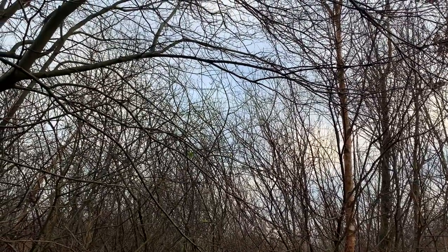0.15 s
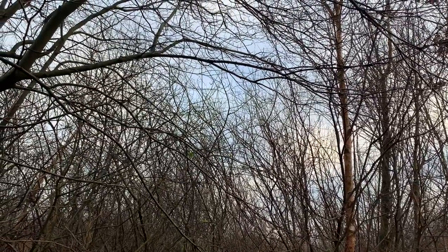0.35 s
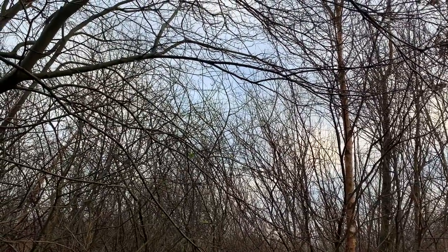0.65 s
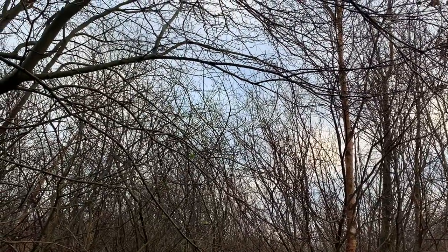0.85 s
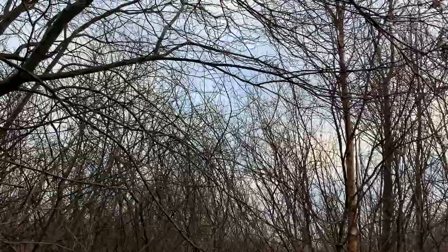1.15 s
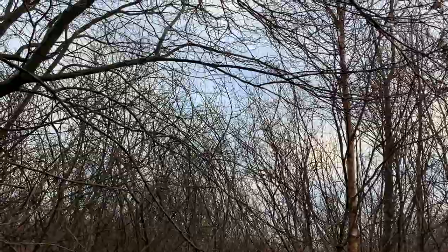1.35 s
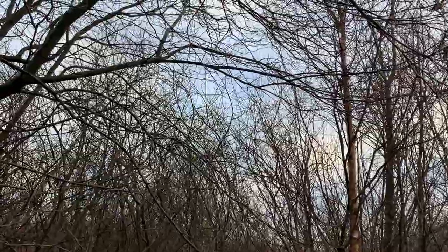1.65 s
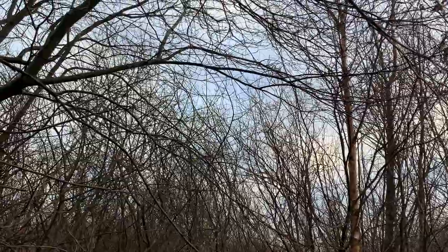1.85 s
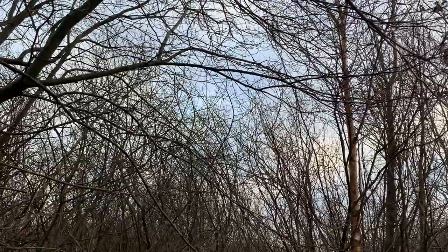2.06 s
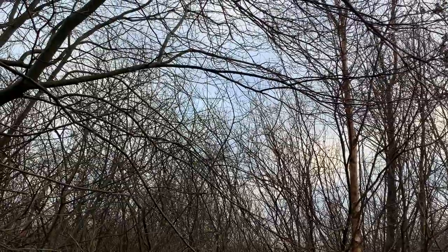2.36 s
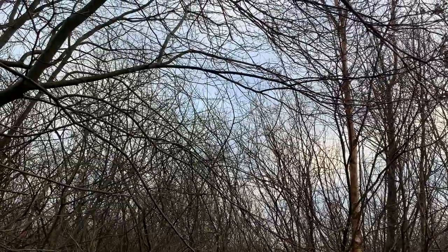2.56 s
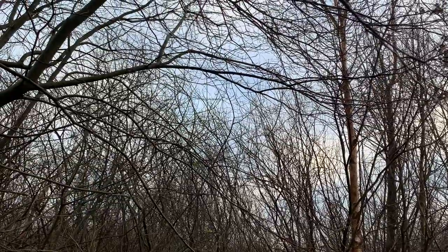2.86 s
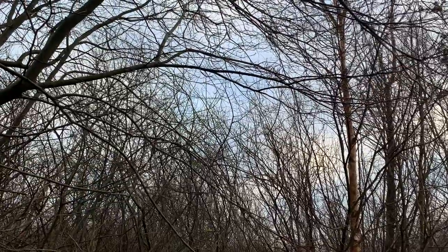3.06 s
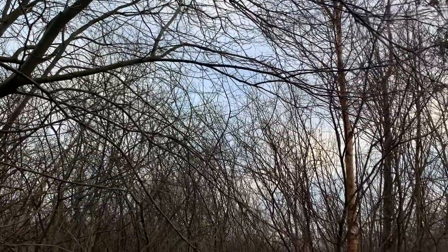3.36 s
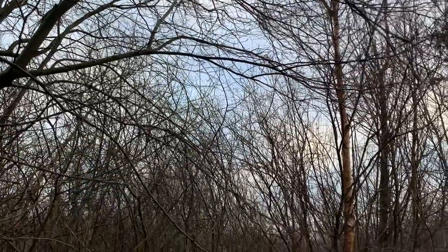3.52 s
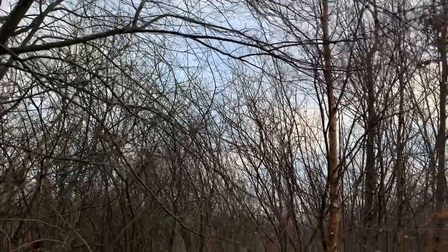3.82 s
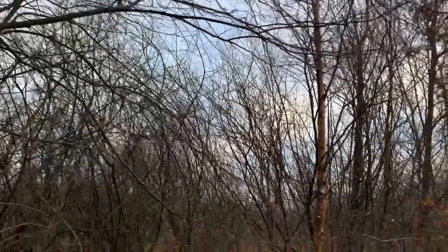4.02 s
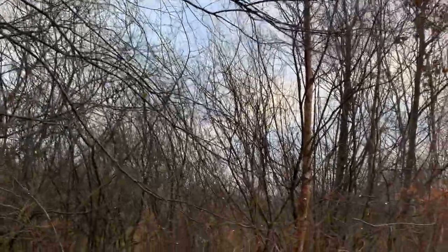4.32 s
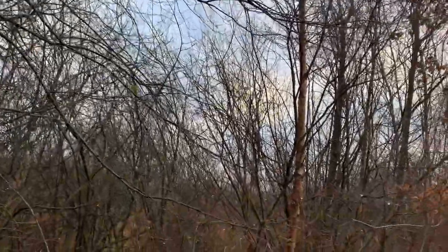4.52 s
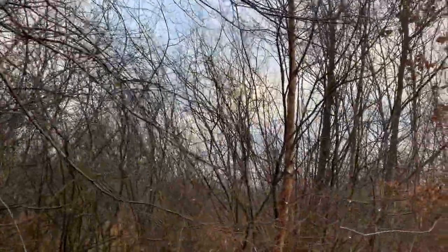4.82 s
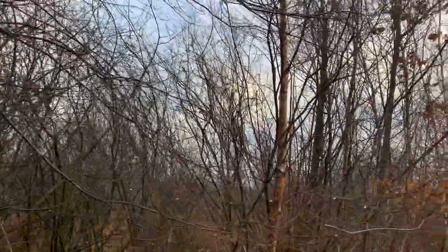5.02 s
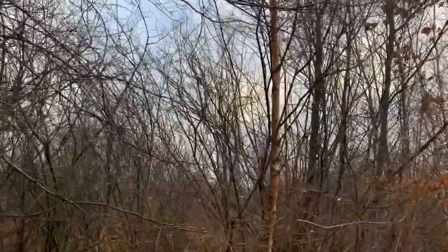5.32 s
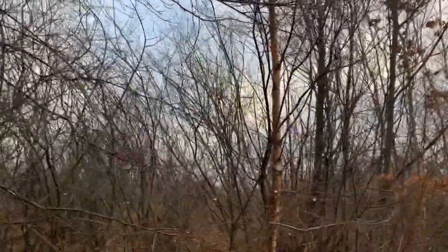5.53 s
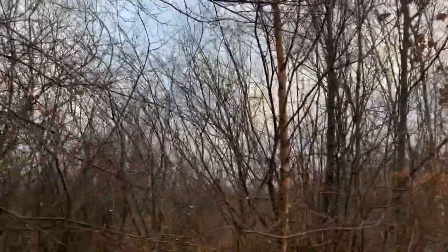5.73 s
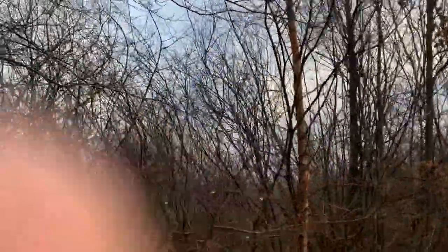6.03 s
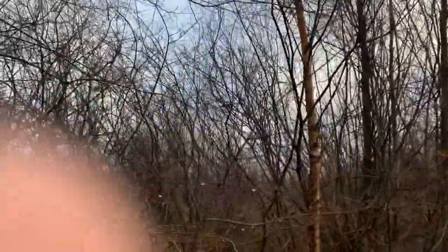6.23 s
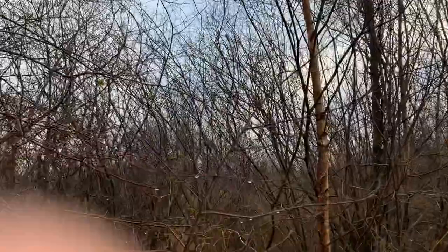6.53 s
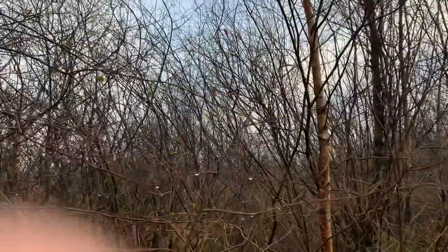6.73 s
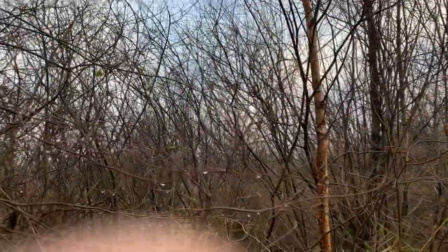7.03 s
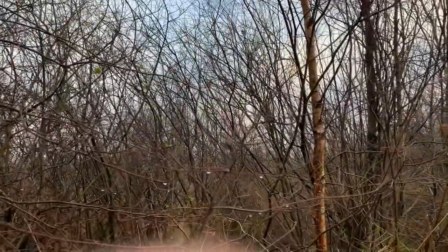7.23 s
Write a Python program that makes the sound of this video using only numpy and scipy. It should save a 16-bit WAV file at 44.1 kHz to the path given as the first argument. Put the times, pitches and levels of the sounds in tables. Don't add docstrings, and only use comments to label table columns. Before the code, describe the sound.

A quiet bare thicket by a marsh, heard through a handheld stereo microphone with light breeze rumbling on its case and faint hiss. At first a far road roars softly, with a brief brighter pass near 1.3 s, then recedes. A hidden marsh bird gives short arched chips at 0.3 and 0.9 s, then a high hoarse squeal from 1.7 to 2 s with a low falling answer. Thin, tiny buzzes from small birds come at the start, 2.4, 3.9 and 6.4-6.8 s. Light knocks begin at 2 s; a very loud hollow knock hits at 4 s, over a squeal stepping down until 4.4 s. From 5 s, taps and dry rubbing cluster. A wavering squeal at 5.8-6.1 s ends in low falling answers from two birds. Hard cracks and thumps strike at 6.45 and, strongest, 6.97 s, then lighter touches until about 7.4 s. Twigs scatter the calls into a short airy tail.

```python
import sys
import numpy as np
from scipy import signal
from scipy.fft import rfft, irfft, next_fast_len
from scipy.io import wavfile
from scipy.ndimage import uniform_filter1d, map_coordinates

SR = 44100
rng = np.random.default_rng(int(sys.argv[2]) if len(sys.argv) > 2 else 0)


def wav_out(sig):
    wavfile.write(sys.argv[1], SR, np.round(np.clip(np.atleast_2d(sig).T, -1, 1) * 32767).astype(np.int16))


def amplitude_ratio(level_db):
    exponent = np.asarray(level_db, float) / 20
    return 10 ** exponent


N = 325388

# time_s, level_db
BREEZE = [(0.0, -54), (0.24, -57), (1.38, -53), (1.79, -55.5), (1.99, -53), (2.53, -53), (2.96, -57.5),
          (4.09, -58), (4.44, -59.5), (4.91, -57.5), (6.0, -60.5), (6.84, -60.5), (7.09, -56.5),
          (7.38, -63)]
# frequency_hz, density_db
RUMBLE = [(20, -39), (40, -5), (65, 4), (100, -2), (160, -13.5), (250, -36.5)]
# time_s, nearness_db, clear_path_db, engine_load_db
ROAD = [(0.0, -57, -1, 5.5), (0.12, -55, -1, 3), (0.43, -59, -2.5, -3), (0.66, -57.5, -0.5, -3),
        (0.78, -56.5, 0.5, 1), (0.9, -54.5, -6, -4), (1.25, -59, 3.5, 4.5), (1.5, -62.5, 6, 1),
        (2.01, -62, 7, 1), (2.71, -67, 4, 0), (3.14, -66, 3, 0), (3.82, -72, 5.5, 1.5),
        (4.17, -66.5, 6.5, 1), (4.7, -66, 1.5, 0.5), (6.35, -67, 0, 1), (6.55, -70, 5, 1.5),
        (7.21, -71, 7, 5.5), (7.38, -63, -3, -0.5)]
# frequency_hz, density_db
DRONE = [(100, -17), (200, 0.5), (350, -1.5), (600, -9.5), (800, 1.5)]
ROAR = [(450, -14), (800, -6), (1150, 4), (1700, -9), (2500, -21.5), (3500, -43)]
WHINE = [(900, -27), (1400, 4), (1750, 8), (2300, -4.5), (3200, -57)]
TYRE_HISS = [(1500, -9.5), (2500, -2.5), (3500, -11.5), (5000, -25), (7000, -42)]
LORRY = [(3000, -10), (4200, 2), (5500, -3), (6800, -18)]
DRONE_DB, ROAR_DB, WHINE_DB, TYRE_HISS_DB = -64.5, -55, -66.5, -71.5
DRONE_FOLLOWS, ROAR_FOLLOWS, WHINE_FOLLOWS, TYRE_HISS_FOLLOWS = 0.043, 0.48, 1.75, 1.45
LORRY_S, LORRY_SWELL_S, LORRY_DB = 1.26, 0.11, -70

# frequency_hz, density_db
SELF_NOISE = [(3000, 14.5), (5000, -7), (7000, 0.5), (9500, 1), (11700, -2), (14000, -1), (16500, -20)]
SELF_NOISE_DB = -82
# frequency_hz, likeness_0_to_1
LIKENESS = [(60, 0.95), (400, 0.99), (800, 0.72), (1700, 0.64), (4000, 0.15), (7000, 0.4), (11700, 1),
            (15000, 0.9)]
# frequency_hz, lag_rad
ROAD_TURN = [(0, 0), (100, .43), (400, 1.55), (800, 3.1), (1700, 3.9), (4000, 8.5), (8000, 17.6),
             (16000, 29.)]
NEAR_TURN = [(0, .1), (100, .34), (400, .9), (800, 1.5), (2760, 3.6), (7000, 9.4), (11700, 15.7),
             (16400, 22.)]
BIRD_TURN = [(0, .1), (800, 1.5), (2950, 3.6), (4700, 5.8), (5900, 8.4), (6700, 8.6), (8800, 11.9),
             (16400, 22.2)]
HAND_TURN = [(0, .1), (170, .48), (400, .9), (650, 1.55), (1000, 1.65), (2150, 4.2), (4700, 5.9),
             (11700, 15.7), (16400, 22.)]
# frequency_hz, left_minus_right_db
TILT = [(60, 0.5), (600, 0), (1300, -3), (2400, -3), (3100, -4), (4700, -2.5), (6300, -5), (9000, 0.5)]

# start_s, length_s, level_db, centre_hz, swing_hz
BUZZES = [
    (0, 0.15, -80.5, 7000, 220),
    (0.326, 0.05, -75.5, 7400, 900),
    (2.392, 0.061, -78.5, 7650, 850),
    (3.366, 0.045, -90, 7300, 700),
    (3.628, 0.069, -82.5, 7420, 910),
    (3.89, 0.041, -72, 7480, 890),
    (6.361, 0.045, -76.5, 7400, 850),
    (6.532, 0.047, -74, 7620, 940),
    (6.774, 0.044, -88, 7250, 810),
]
THICKET_T60_S, THICKET_DB = 0.32, -4.5
TWIG_GLINT_HZ, TWIG_GLINT_DB, TWIG_GLINT_T60_S, TWIG_HZ = 7500, 9, 0.5, 3700

# start_s, ring_db, thump_db, ring_hz
KNOCKS = [(2.06, -54, -50.5, 855), (3.419, -47, -57, 800), (4.02, -13.5, -27.5, 686),
          (4.038, -43, -50, 711), (4.138, -42, -50.5, 718), (4.185, -31, -41.5, 704),
          (4.203, -41.5, -46, 700), (4.244, -33, -43.5, 703), (4.756, -60, -54.5, 710),
          (4.833, -63, -48, 620), (5.07, -39.5, -59, 674), (5.156, -43, -58, 674), (5.421, -47, -74, 945),
          (5.479, -33.5, -64, 880), (5.678, -38, -49, 780), (5.695, -33, -40.5, 820),
          (5.807, -48, -54, 950), (6.035, -37.5, -63, 894), (6.106, -52, -51, 770), (6.21, -51, -64, 750),
          (6.292, -49, -48, 725), (6.391, -48, -54, 756), (6.426, -38, -47.5, 830),
          (6.451, -25.5, -47, 1010), (6.454, -26.5, -32, 747), (6.975, -14.5, -23, 810),
          (7.013, -41.5, -67, 730), (7.089, -36.5, -56, 730), (7.177, -50, -60, 719), (7.24, -40, -48, 796)]
MORE_KNOCKS = [(2.566, -69, -54.5, 950), (4.012, -42, -67, 620), (4.048, -48, -65, 756), (5.156, -42, -80, 1430),
               (5.18, -51.5, -64, 650), (5.312, -62, -65, 727), (5.333, -51, -65, 875), (5.36, -47, -72, 845),
               (5.43, -45, -74, 900), (5.452, -46, -68, 865), (5.469, -39.5, -55, 830), (5.493, -39, -55, 780),
               (5.53, -42, -55, 820), (6.325, -62, -50, 500), (6.417, -53, -60, 1000), (6.436, -44, -47, 890),
               (6.443, -35.5, -52, 1030), (6.674, -53, -74, 810), (6.703, -56, -54.5, 720), (6.775, -52, -74, 770),
               (6.908, -54, -68, 665), (6.93, -52, -82, 790), (6.968, -42, -60, 1000), (6.972, -32, -68, 1070),
               (6.9744, -18, -64, 1053), (7.165, -59, -70, 775), (7.191, -49, -57, 710), (7.22, -63, -56, 807)]
# start_s, peak_db, pitch_hz
THUDS = [(1.462, -43.5, 134), (2.57, -39.5, 74.4), (3.389, -40, 48.6), (3.826, -34.5, 60.3),
         (4.029, -35, 70), (4.401, -43.5, 68.6), (4.834, -49, 300), (4.851, -64, 262), (5.021, -44, 62),
         (5.079, -44, 100.3), (6.323, -46, 112), (6.368, -47, 89), (6.456, -28, 84), (6.688, -42.5, 64),
         (6.984, -37, 75), (7.11, -47, 70.6)]
# start_s, peak_db, brightness_db
CRACKS = [
    (2.059, -53, -7),
    (5.676, -45.5, -4),
    (5.694, -46, -3),
    (6.446, -31, -11),
    (6.4494, -27.5, -6.5),
    (6.457, -49, -8),
    (6.9725, -23, -1),
    (7.012, -48, -7),
    (7.089, -49, -10),
]
# peak_s, swell_s, release_s, level_db, hiss_db
RUBS = [(5.36, 0.098, 0.026, -51, -74), (3.72, 0.14, 0.65, -95, -74), (5.445, 0.03, 0.14, -60.5, -82),
        (5.523, 0.13, 0.023, -43, -62), (5.709, 0.072, 0.1, -52, -65.5), (5.816, 0.031, 0.18, -54, -68.5),
        (6.039, .02, 0.045, -40.5, -65), (6.293, 0.0053, 0.29, -55.5, -87), (6.447, 0.048, 0.028, -35, -64),
        (6.68, 0.07, 0.084, -55, -92.5), (7.0, 0.033, 0.07, -56, -67), (7.2, 0.12, 0.042, -57, -73),
        (7.241, 0.053, 0.036, -50.5, -82)]
# frequency_hz, density_db
SKIN = [(1500, 6), (3000, 0), (5000, -15), (9000, -14.5), (16000, -19)]
RUB_DEPTH_DB = 26.5
SPREAD_HZ = 267
PAD_HZ = 2200

# start_s, length_s, top_hz, level_db
CHIPS = [
    (0.293, .042, 2532, -58),
    (0.925, 0.034, 2535, -56.5),
]
# time_s, pitch_hz, effort_db, beak_db_per_partial
SQUEALS = [
    [(1.69, 3213, -58, -14), (1.706, 3300, -53, 0), (1.72, 3214, -67, 13.5), (1.75, 2824, -58, -7),
     (1.78, 2784, -55.5, -6.5), (1.8, 2828, -57, -3), (1.812, 2780, -69, 14)],
    [(1.813, 2883, -67, 15), (1.83, 2880, -54, -3.5), (1.86, 2930, -70, 7.5), (1.885, 2914, -52.5, -2.5),
     (1.92, 2973, -61, -6), (1.954, 2970, -76, 4), (1.99, 2980, -55, -10)],
    [(5.83, 2637, -60, -14), (5.842, 3040, -50, 0), (5.862, 3140, -58, 5), (5.91, 2894, -53, -8),
     (5.96, 2968, -53, -6), (6.0, 2758, -50.5, -9), (6.03, 2817, -59, -3.5), (6.065, 2904, -50.5, -7),
     (6.1, 3215, -64, 0)],
]
# time_s, pitch_hz, effort_db, beak_db_per_partial
STEPPED = [
    [(3.975, 3150, -51, -5), (3.989, 3320, -53.5, 3.5), (4.039, 2807, -64.5, 7), (4.07, 2646, -65.5, 10.5),
     (4.11, 2760, -55.5, 1.5), (4.124, 2685, -54, -2.5), (4.131, 2508, -55, -6.5), (4.169, 2480, -61, -7),
     (4.195, 2596, -61, -6)],
    [(4.196, 2560, -57, -8), (4.21, 2593, -53, -4), (4.222, 2253, -65, 5), (4.244, 2293, -60, 2),
     (4.254, 2280, -66, 0), (4.266, 2354, -63, 9), (4.277, 2337, -62, 1), (4.286, 2400, -62.5, 9.5)],
    [(4.287, 2440, -61, 9), (4.305, 2450, -61, 0), (4.311, 2350, -69, 0), (4.318, 2240, -58, -3),
     (4.345, 2210, -62.5, 4), (4.356, 2095, -63, 2), (4.367, 2050, -69, 5)],
]
# start_s, length_s, first_hz, level_db, sag_hz_per_s
ANSWERS = [
    (1.967, 0.043, 1558, -66, 6010),
    (6.096, 0.074, 1685, -61.5, 3830),
]
# start_s, length_s, first_hz, level_db, sag_hz_per_s
MATE = [
    (6.097, 0.067, 1455, -68.5, 2580),
]
# frequency_hz, gain_db
THROAT = [(2300, 1.5), (3000, 1), (4700, -2.5), (6000, -7.5), (8500, -24), (10300, -26.5), (12400, -23),
          (15500, -31.5)]
STEPPED_THROAT = [(2300, 3), (3000, -2), (4700, -2), (6000, -11), (8200, -25.5), (9600, -40),
                  (11000, -21.5), (14500, -34.5)]
CHIP_THROAT = [(2300, 0), (4700, -2), (7500, -17), (10000, -34), (12500, -37), (15000, -44)]
ANSWER_THROAT = [(1500, -4), (3000, -4), (4200, 1.5), (5700, -6), (7000, -13), (10000, -46), (12300, -27),
                 (15500, -33)]
HOARSE_RAD, STEPPED_HOARSE_RAD = 0.022, 0.04
PATCHY_DB = 1.8
RASP_DB, RASP_HZ = -24, 4800
STRAIN_HZ, STRAIN_DB_PER_KHZ, ANSWER_STRAIN_DB_PER_KHZ = 2720, 36, 2
CHIP_RISE_HZ, CHIP_FALL_HZ, CHIP_TOP_SHARE, CHIP_EDGE_DB, CHIP_BEAK_DB = 295, 400, 0.45, 4.5, 1.5
SAG_DELAY_S, ANSWER_RISE_DB, ANSWER_FADE_DB, ANSWER_BEAK_DB = 0.01, 0, 5, 1


def columns(rows, t):
    time_s, *rest = np.transpose(rows)
    return [np.interp(t, time_s, column) for column in rest]


def on_log(points, hz):
    point_hz, value = np.transpose(points)
    return np.interp(np.log(hz + 1), np.log(point_hz), value)


def rms_one(x):
    return x / np.sqrt(np.mean(x ** 2) + 1e-20)


def drift(rate, n):
    knots = rng.standard_normal(int(n / SR * rate) + 3)
    return map_coordinates(knots, [np.arange(n) / SR * rate], order=3)


def noise(spectrum, flicker_db, rate):
    size = next_fast_len(N)
    hz = np.arange(size // 2 + 1) * SR / size
    inside = (hz > spectrum[0][0]) * (hz < spectrum[-1][0])
    gain = amplitude_ratio(on_log(spectrum, hz)) * inside
    alike = np.clip(on_log(LIKENESS, hz), 0, 1)
    mid, side = rfft(rng.standard_normal((2, size))) * gain
    pair = np.sqrt(1 + alike) * mid + np.sqrt(1 - alike) * side * [[1], [-1]]
    return rms_one(irfft(pair, size)[:, :N]) * amplitude_ratio(flicker_db * drift(rate, N))


def resonate(x, hz, width_hz, order=2):
    radius = np.exp(-np.pi * width_hz / SR)
    angle = 2 * np.pi * hz / SR
    poles = [1, -2 * radius * np.cos(angle), radius * radius]
    click = np.r_[1., np.zeros(4000)]
    for _ in range(order):
        x = signal.lfilter([1, 0, -1], poles, x)
        click = signal.lfilter([1, 0, -1], poles, click)
    return x / np.abs(click).max()


def butter_pass(x, hz, kind):
    return signal.sosfilt(signal.butter(2, hz, kind, fs=SR, output="sos"), x)


def add(out, s, sound):
    at = round(s * SR)
    out[at:at + len(sound)] += sound[:len(out) - at]


def fade(n, s):
    to_edge = np.minimum(np.arange(n), np.arange(n)[::-1])
    return np.minimum(1, to_edge / (s * SR))


def two_ports(pair, turn, tilt=1.):
    size = next_fast_len(N + 4096)
    hz = np.arange(size // 2 + 1) * SR / size
    half = amplitude_ratio(tilt * on_log(TILT, hz) / 2)
    lag = np.exp(-1j * np.interp(hz, *np.transpose(turn)))
    left = rfft(pair[0], size) * half * lag
    right = rfft(pair[1], size) / half
    return irfft(np.array([left, right]), size)[:, :N]


def microphone_hiss():
    return amplitude_ratio(SELF_NOISE_DB) * noise(SELF_NOISE, 0.55, 9.3)


def breeze():
    level_db = columns(BREEZE, np.arange(N) / SR)[0] + 4
    return amplitude_ratio(level_db) * noise(RUMBLE, 0.37, 12.)


def road():
    t = np.arange(N) / SR
    near_db, clear_db, load_db = columns(ROAD, t)
    near_db = near_db - near_db.mean()
    roar = amplitude_ratio(ROAR_DB + ROAR_FOLLOWS * near_db + 0.75 * load_db) * noise(ROAR, 0.87, 14.)
    whine = amplitude_ratio(WHINE_DB + WHINE_FOLLOWS * near_db) * noise(WHINE, 0.53, 35.0)
    drone = amplitude_ratio(DRONE_DB + DRONE_FOLLOWS * near_db + load_db) * noise(DRONE, 1.8, 12.)
    passing = np.exp(-0.5 * ((t - LORRY_S) / LORRY_SWELL_S) ** 2)
    lorry = amplitude_ratio(LORRY_DB) * passing * noise(LORRY, 1.0, 14.)
    hiss_db = TYRE_HISS_DB + TYRE_HISS_FOLLOWS * near_db + clear_db
    hiss = amplitude_ratio(hiss_db) * noise(TYRE_HISS, 0.17, 21.0)
    return drone + roar + whine + lorry + hiss


def thicket(x, wet_db):
    t = np.arange(int(0.5 * SR)) / SR
    onset = np.clip((t - 0.002) / 0.0045, 0, 1)
    tail = rng.standard_normal((2, len(t))) * amplitude_ratio(-60 * t / THICKET_T60_S) * onset
    tail = butter_pass(tail, TWIG_HZ, "high")
    tail[1] = 0.22 * tail[0] + 1.7 * tail[1]
    tail *= amplitude_ratio(wet_db) / np.sqrt(np.sum(tail ** 2, axis=1, keepdims=True))
    glint = butter_pass(tail[0], TWIG_GLINT_HZ, "high")
    tail = tail + amplitude_ratio(TWIG_GLINT_DB - 60 * t / TWIG_GLINT_T60_S) * glint
    return x + signal.fftconvolve(x[None], tail, axes=1)[:, :N]


def small_birds():
    out = np.zeros(N)
    for s, length, db, centre_hz, swing_hz in BUZZES:
        t = np.arange(0, length, 1 / SR)
        swing_rate_hz = 135 + 35 * drift(71.4, len(t))
        swing = np.sin(2 * np.pi * np.cumsum(swing_rate_hz) / SR)
        hz = centre_hz + swing_hz * swing + 120 * drift(242, len(t))
        whistle = np.sin(2 * np.pi * np.cumsum(hz) / SR)
        add(out, s, amplitude_ratio(db + 2.9 * drift(130, len(t))) * whistle * fade(len(t), 0.013))
    return out


def knocks():
    out, t = np.zeros(N), np.arange(3500) / SR
    click = 1. * (t == 0)
    thump = resonate(click, 141.4, 114.0)
    thump = thump + amplitude_ratio(5.0) * resonate(click, 194, 233.0) + amplitude_ratio(3.0) * resonate(click, 323, 400.0)
    lag = np.exp(-2 * np.pi * SPREAD_HZ / SR)
    thump = signal.sosfilt([[lag * lag, -2 * lag, 1, 1, -2 * lag, lag * lag]] * 2, thump)
    for s, ring_db, thump_db, hz in KNOCKS + MORE_KNOCKS:
        ring = resonate(click, hz, 428.0, order=4)
        ring = ring - amplitude_ratio(-17.0) * resonate(click, 1.308 * hz, 400.0, order=3)
        add(out, s - 0.0003, amplitude_ratio(ring_db + 3.5) * ring + amplitude_ratio(thump_db + 1.0) * thump)
    out = butter_pass(out, PAD_HZ, "low")

    for s, db, bright_db in CRACKS:
        grit = rng.standard_normal(len(t))
        snap = click + 0.044 * grit * amplitude_ratio(-60 * t / 0.0013)
        rattle = signal.lfilter([0.4], [1, -0.6], grit) * amplitude_ratio(-39 - 60 * t / 0.17)
        body = amplitude_ratio(-3.0) * resonate(snap, 2000, 970.0) + amplitude_ratio(-13.5) * resonate(snap, 3480, 810.0)
        top = amplitude_ratio(-6.0) * resonate(snap, 7100, 1500.0, order=1) + resonate(snap, 10440, 8900.0, order=1)
        add(out, s + 0.001865, amplitude_ratio(db) * (body + amplitude_ratio(bright_db) * top + rattle))

    for s, db, hz in THUDS:
        add(out, s - 0.003, amplitude_ratio(db) * resonate(click, hz, 55.6, order=3))
    return out


def rubbing():
    t = np.arange(N) / SR
    slips = (rng.random(N) < 800 / SR) * amplitude_ratio(2.0 * rng.exponential(1, N)) * rng.choice([-1, 1], N)
    body = rms_one(resonate(slips, 798, 440.0, order=3))
    body = body + amplitude_ratio(-6.5) * rms_one(resonate(slips, 130, 323.0))
    hiss = noise(SKIN, 0.75, 40.)
    pressure = []
    for peak_s, swell_s, release_s, *_ in RUBS:
        away = np.maximum((peak_s - t) / swell_s, (t - peak_s) / release_s)
        pressure.append(amplitude_ratio(-RUB_DEPTH_DB * away ** 1.8))
    level_db, hiss_db = np.transpose(RUBS)[3:]
    return amplitude_ratio(level_db) @ pressure * body + amplitude_ratio(hiss_db) @ np.power(pressure, 0.7) * hiss


def chip(s, length, top_hz, db):
    share = np.linspace(0, 1, 9)
    rising = share < CHIP_TOP_SHARE
    off_top = np.where(rising, 1 - share / CHIP_TOP_SHARE, (share - CHIP_TOP_SHARE) / (1 - CHIP_TOP_SHARE))
    hz = top_hz - np.where(rising, CHIP_RISE_HZ, CHIP_FALL_HZ) * off_top ** 1.2
    effort_db = db - CHIP_EDGE_DB * off_top ** 2
    return [(s + a * length, f, e, CHIP_BEAK_DB) for a, f, e in zip(share, hz, effort_db)]


def answer(s, length, hz, db, sag):
    last_hz = hz - sag * (length - SAG_DELAY_S)
    return [(s, hz, db - ANSWER_RISE_DB, ANSWER_BEAK_DB),
            (s + SAG_DELAY_S, hz, db, ANSWER_BEAK_DB),
            (s + length, last_hz, db - ANSWER_FADE_DB, ANSWER_BEAK_DB)]


def marsh_bird(notes, strain_db, throat=THROAT, hoarse=HOARSE_RAD):
    t = np.arange(N) / SR
    sounding = sum((t >= note[0][0]) & (t <= note[-1][0] + 0.002) for note in notes) > 0
    gate = uniform_filter1d(1. * sounding, size=180)[sounding] * 2 - 1
    t = t[sounding]
    n = len(t)
    hz, effort_db, beak_db = columns(sorted(sum(notes, [])), t)
    hz = uniform_filter1d(hz, size=130) * (1 + 0.0056 * drift(160, n))
    phase = 2 * np.pi * np.cumsum(hz) / SR
    slack_db = strain_db * np.minimum(hz - STRAIN_HZ, 0) / 1000
    tremor = hoarse * drift(700, n)
    voice = np.zeros(n)
    for k in range(1, 9):
        db = effort_db + (k > 1) * beak_db + np.clip(k / 2 - 1, 0, 1) * slack_db + on_log(throat, k * hz)
        if k == 2:
            rasp_db = db + RASP_DB
        waver_db = (2.5 + 0.3 * k) * drift(59.8, n)
        breaks_db = PATCHY_DB * max(k - 2, 0) * drift(20.8, n)
        below_limit = np.clip((15600 - k * hz) / 400, 0, 1)
        voice += amplitude_ratio(db + waver_db + breaks_db) * np.sin(k * phase + k * k * tremor) * below_limit
    rasp = rms_one(resonate(rng.standard_normal(n), RASP_HZ, 2300.0))
    voice += amplitude_ratio(rasp_db) * rasp
    out = np.zeros(N)
    out[sounding] = voice * amplitude_ratio(11.5) * np.clip(gate, 0, 1)
    return out


def scene():
    floor = two_ports(microphone_hiss(), NEAR_TURN, tilt=0.1)
    far = two_ports(road() + breeze(), ROAD_TURN)
    hands = two_ports(knocks() + rubbing(), HAND_TURN, tilt=-1.68)
    calls = marsh_bird([chip(*row) for row in CHIPS], STRAIN_DB_PER_KHZ, CHIP_THROAT)
    calls = calls + marsh_bird(SQUEALS, STRAIN_DB_PER_KHZ)
    calls = calls + marsh_bird(STEPPED, STRAIN_DB_PER_KHZ, STEPPED_THROAT, STEPPED_HOARSE_RAD)
    for bird in (ANSWERS, MATE):
        notes = [answer(*row) for row in bird]
        calls = calls + marsh_bird(notes, ANSWER_STRAIN_DB_PER_KHZ, ANSWER_THROAT, STEPPED_HOARSE_RAD)
    birds = two_ports(thicket(calls, THICKET_DB) + thicket(small_birds(), 5.9), BIRD_TURN)
    return floor + far + hands + birds


def band_limit(x):
    return signal.sosfilt(signal.butter(12, 16510, fs=SR, output="sos"), x)


def record(dry):
    return band_limit(dry)


dry = scene()
out = record(dry)
wav_out(out)
```